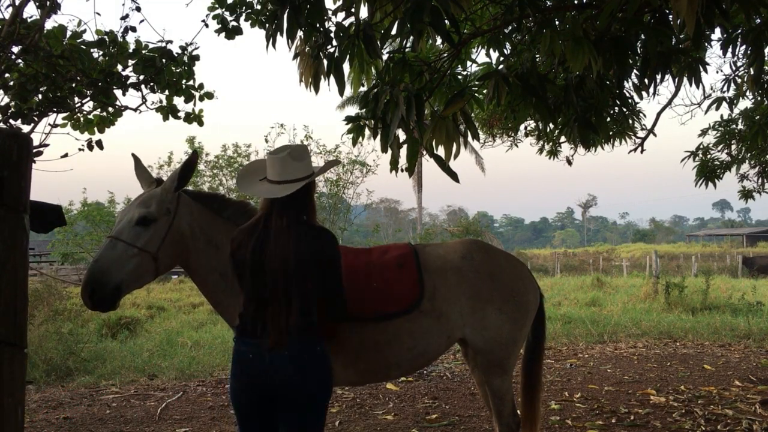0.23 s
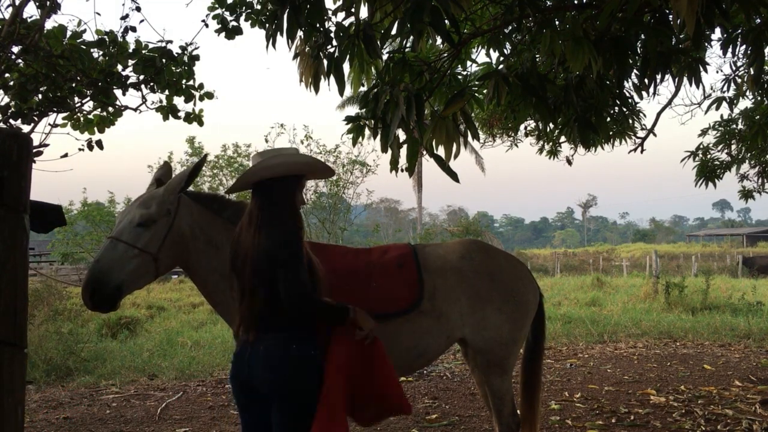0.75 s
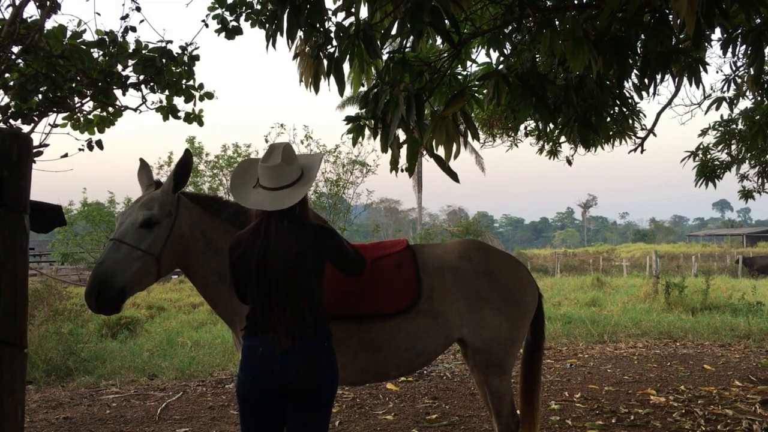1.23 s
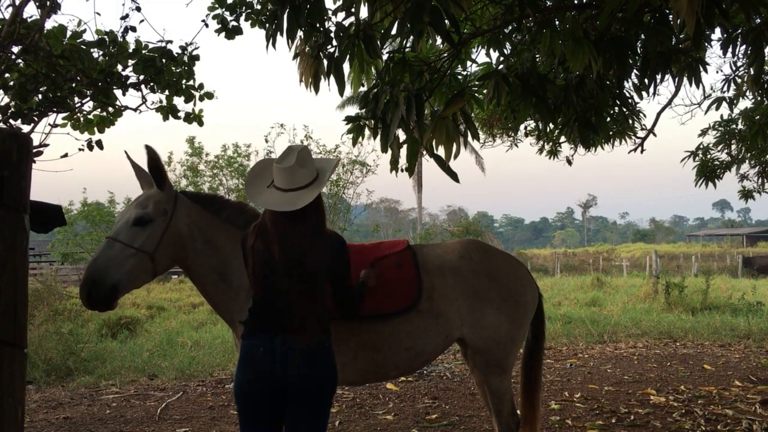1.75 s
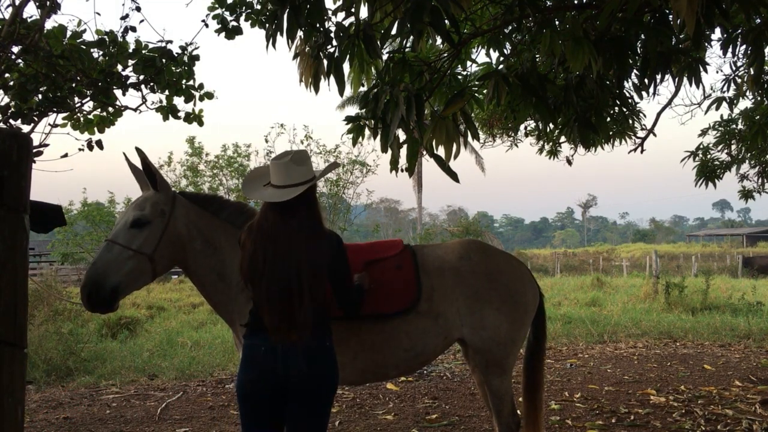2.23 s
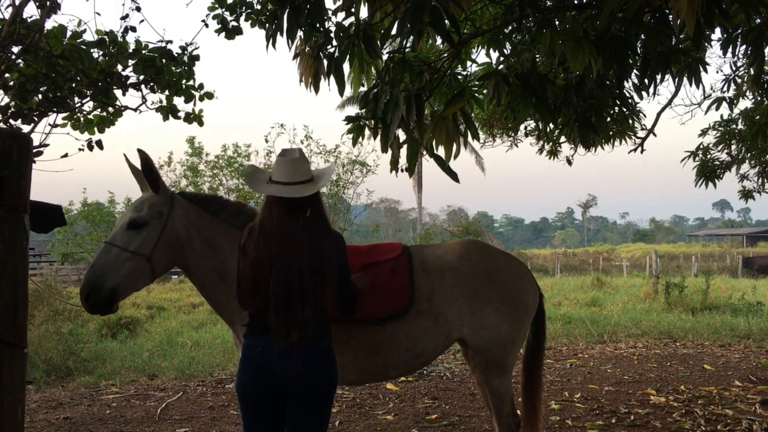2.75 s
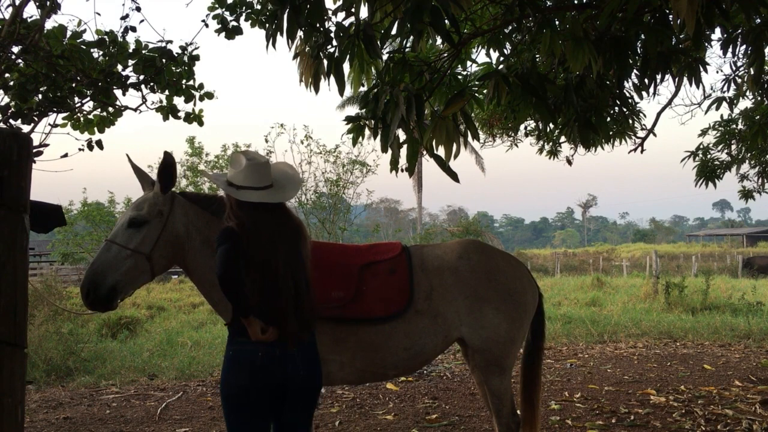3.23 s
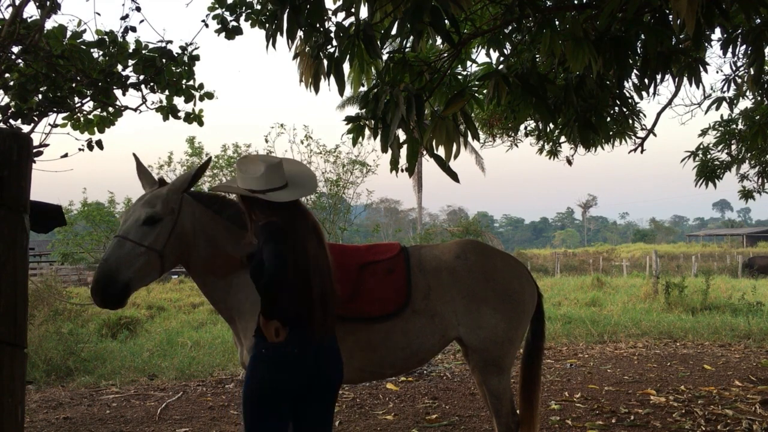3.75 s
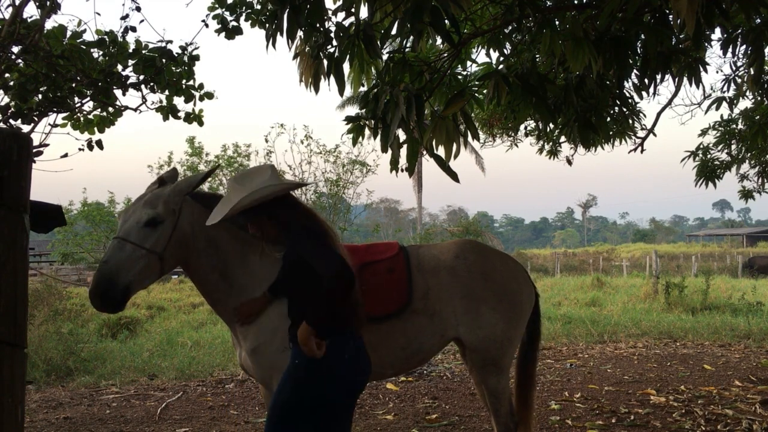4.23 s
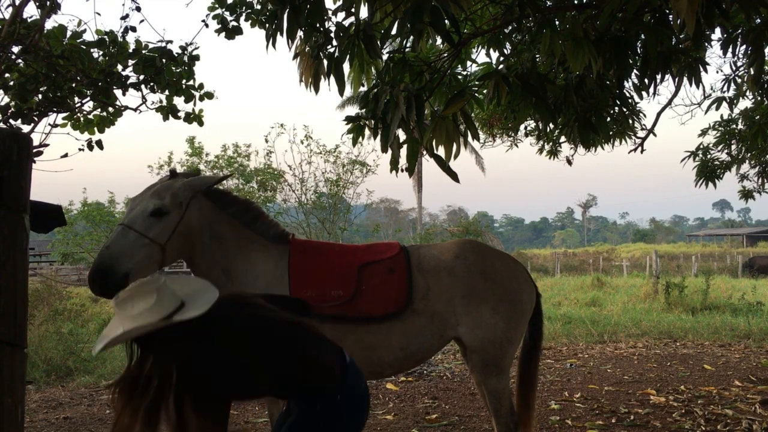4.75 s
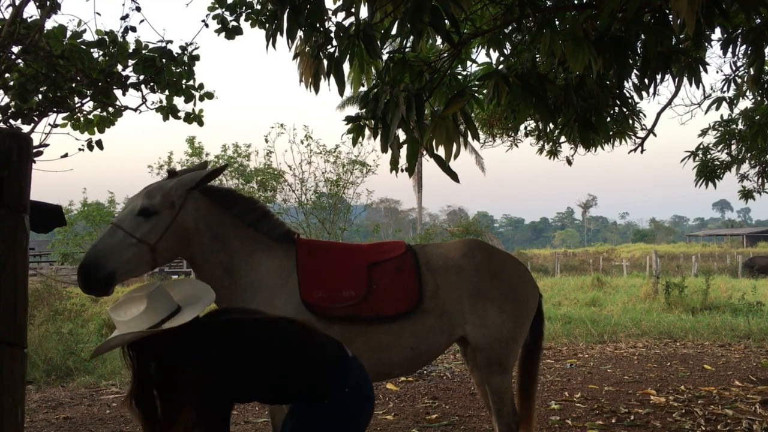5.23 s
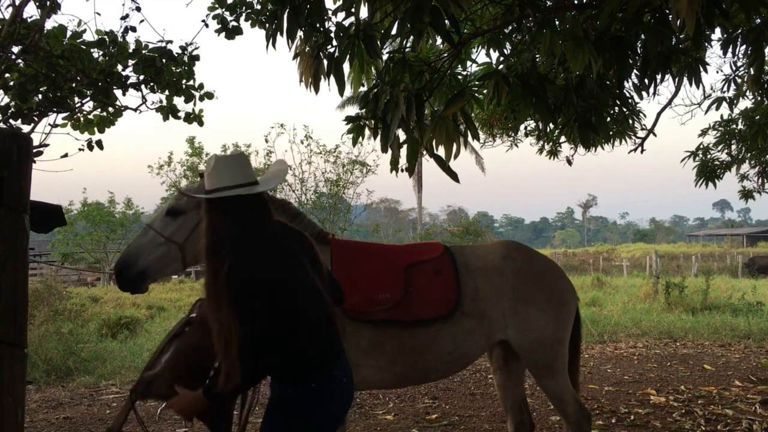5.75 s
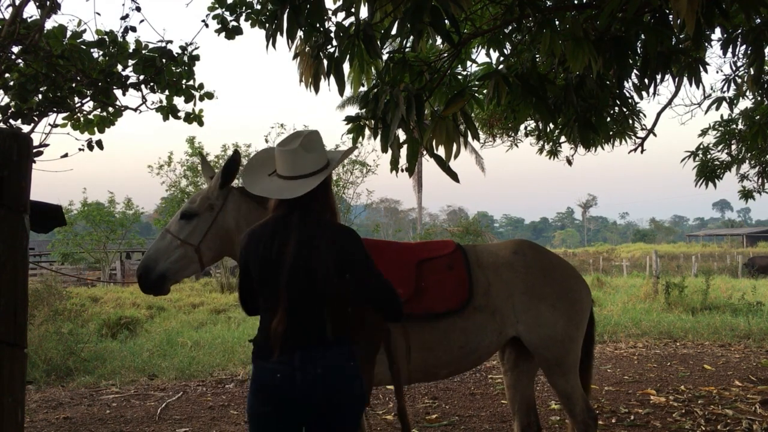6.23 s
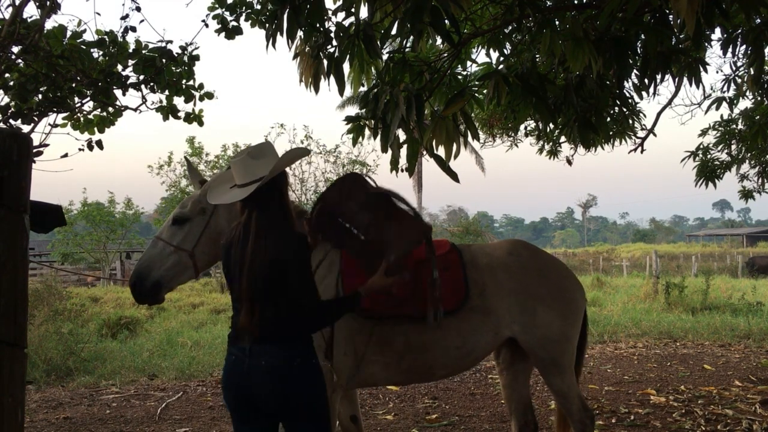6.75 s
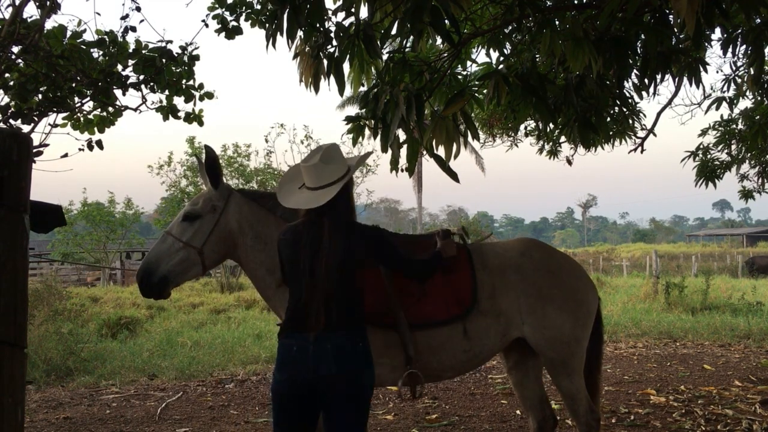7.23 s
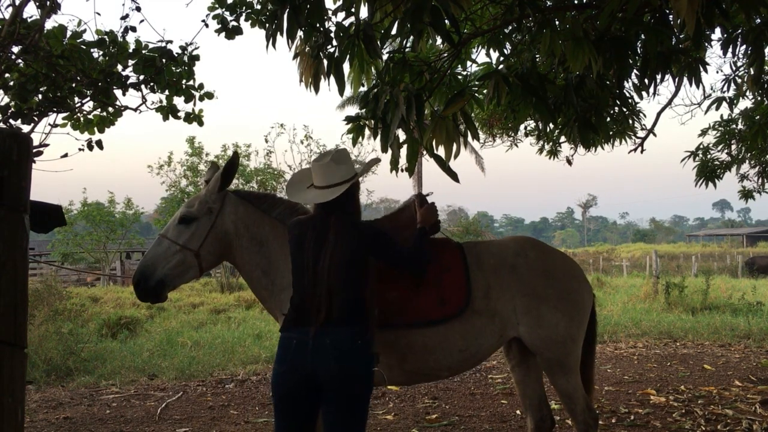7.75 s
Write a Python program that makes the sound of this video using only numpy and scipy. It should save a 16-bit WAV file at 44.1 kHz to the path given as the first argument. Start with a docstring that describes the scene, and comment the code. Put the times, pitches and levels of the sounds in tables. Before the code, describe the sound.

Cattle moo and bellow in the distance while close saddle tack rustles, thumps and gives one sharp steel clink.

```python
"""Under a tree on a farm, one microphone close to a mule being saddled. Some way off, cattle give three
low moos and one high, cracking bellow, vocal folds pulsing through throat and nose; a farther cow
sounds thin and nasal. Close by, blanket and leather rub, rustle and thump, tack steel ticks, and the
steel cinch ring chatters in one loud clink. Small birds chirp over a thin hiss of insects."""
import sys
import numpy as np
from scipy import signal
from scipy.fft import rfft, irfft
from scipy.io import wavfile
from scipy.ndimage import uniform_filter1d

SR = 44100
rng = np.random.default_rng(int(sys.argv[2]) if len(sys.argv) > 2 else 0)


def unload_wav(signal):
    """Save mono or channel-first audio to the path in sys.argv[1] as 16-bit WAV at rate SR, clipped to [-1, 1]."""
    wavfile.write(
        sys.argv[1],
        SR,
        np.round(np.clip(np.atleast_2d(signal).T, -1, 1) * 32767).astype(np.int16),
    )


N = 352338
T = np.arange(N) / SR
CUTOFF_HZ = 15900

# modes of the steel cinch ring: pitch_hz, chatter_db, after_ring_db
RING_MODES = [(1600, -42, -16), (1730, -40, -20), (3192, -31, -19), (4803, -37, -9), (5250, -33, -7),
              (7211, -30, -21), (7620, -43, -4), (8890, -37, -16), (9917, -24, -14), (11083, -35, -15),
              (11740, -32, -13), (12732, -33, -18), (13315, -27, -21), (13958, -29, -21), (15402, -35, -10)]


def moos():
    """Some way off, a nasal hum climbs and drops back into the chest; the open mouth adds a roar."""
    # one curve for each moo: time_s, pitch_hz, mouth_opening (0-1)
    curves = [
        [(2.154, 53.6, 0), (2.3, 55.77, 0.07), (2.5, 88.2, 0.12), (2.59, 97.2, 0.43), (2.85, 80.46, 0.27),
         (2.945, 64.1, 0.13)],
        [(3.975, 54.78, 0.21), (4.07, 88.2, 0.18), (4.2, 103.4, 0.72), (4.27, 128.3, 0.54), (4.39, 146.9, 0.66),
         (4.62, 146.1, 0.45), (4.73, 134.6, 0.38), (4.755, 83, 0.4), (4.88, 74, 0.25)],
        [(5.865, 75.87, 0.18), (5.94, 82.64, 0.31), (6.05, 148.2, 0.42), (6.23, 145.9, 1), (6.31, 133.8, 0.48),
         (6.36, 122.7, 0.43), (6.44, 141, 0.61), (6.53, 143.8, 0.45), (6.56, 79.5, 0.35), (6.62, 73.6, 0.24)],
    ]
    # what each moo swells to: level_db
    end_levels = [-49.5, -46.5, -45.5]
    # resonances of the open mouth: centre_hz, width_hz, gain_db
    mouth_modes = [(606, 180, -4.5), (846, 143, 3), (1112, 154, 2), (1330, 210, -6.5), (1793, 440, -10),
                   (3250, 260, -18.5)]
    slack_hz, doubling_hz = 90.2, 138  # folds flap weakly below the first; pulses alternate above the second
    times, hz, mouth = np.concatenate(curves).T
    pitch, opening = np.interp(T, times, hz), np.interp(T, times, mouth)
    level = 0
    for curve, db in zip(curves, end_levels):
        start, end = curve[0][0], curve[-1][0]
        level += from_db(db) * envelope(start, end - start, 0.014, 0.081, swell_db_per_s=6.5)
    tension = np.minimum(pitch / slack_hz, 1)
    rough = .12 + .9 * opening ** 2 + (1 - tension)
    doubling = 0.31 * (1 + np.tanh((pitch - doubling_hz) / 2))
    pulses = folds(pitch, rough, jitter=.08, doubling=doubling)
    hum = tension ** 3 * throat(band(pulses, 85, 283.4, order=6), [(194, 162, 0)])  # through the nose
    chest = rms_one(band(pulses, 47, 108)) * (slack_hz / pitch) ** 2.07
    roar = opening * throat(folds(pitch, rough=1.4, jitter=.02, doubling=doubling), mouth_modes)
    return level * (hum + from_db(-7.5) * chest + roar)


def bellow():
    """A soft rising moan cracks into high surges that swell and climb, rasping on every sixth cycle."""
    # surges of the broken voice, levels relative: start_s, length_s, cry_db, rasp_db
    surges = [(3.238, 0.28, -36, -49), (3.53, 0.06, -45, -66), (3.626, 0.063, -47, -56),
              (3.76, 0.075, -44, -54.5), (3.948, 0.09, -43, -59.5), (4.254, 0.073, -47, -58)]
    # throat resonances of the cry: centre_hz, width_hz, gain_db
    cry_modes = [(405, 1130, -20), (1109, 146, 0), (1500, 105, -16.5), (2010, 560, -15.5), (2810, 320, -20)]
    # throat resonances of the rasp: centre_hz, width_hz, gain_db
    rasp_modes = [(534, 140, -1.5), (753, 100, 8.5), (1065, 253, 11.5), (1750, 880, -6), (2730, 550, -20)]
    moan_s, break_s, cry_hz = 2.98, 3.235, 515.6
    edges = dict(attack_s=0.012, release_s=0.037)
    pitch = 305.9 + 290 * np.clip(T - moan_s, 0, 1)
    cry = from_db(-60) * envelope(moan_s, break_s - moan_s, **edges, swell_db_per_s=56)
    rasp = from_db(4) * cry
    for start, length, cry_db, rasp_db in surges:
        pitch = np.where(T < start, pitch, cry_hz + 135 * np.minimum(T - start, length))
        cry += from_db(cry_db) * envelope(start, length, **edges, swell_db_per_s=51)
        rasp += from_db(rasp_db) * envelope(start, length, 0.011, 0.11, swell_db_per_s=8)
    tone = throat(folds(pitch, rough=.7, jitter=0.024), cry_modes) * from_db(2 * drift(50))
    rasp_pitch = np.where(pitch < cry_hz, pitch, pitch / 6)
    pulses = folds(rasp_pitch, rough=.7, jitter=.02)
    growl = throat(pulses, rasp_modes) + from_db(-12.5) * rms_one(band(pulses, 232, 520))
    return from_db(-0.3) * cry * tone + from_db(2.5) * rasp * growl


def far_cow():
    """Only the nasal ring of these calls carries across the pasture; pitch and level arch together."""
    # distant calls, levels relative: start_s, length_s, first_hz, last_hz, level_db
    calls = [(2.19, .62, 107.8, 104.9, -53.5), (7.3, .44, 112.9, 118.4, -52)]
    # nasal resonances: centre_hz, width_hz, gain_db
    nasal_modes = [(1545, 78, 17), (1850, 730, 5.6)]
    out = 0
    for start, length, first_hz, last_hz, db in calls:
        effort = arch(start, length)
        pitch = np.interp(T, [start, start + length], [first_hz, last_hz]) + 9 * effort
        out += from_db(db - 6.5) * effort * throat(folds(pitch, rough=0.12, jitter=0.029), nasal_modes)
    return out


def cinch_ring():
    """Close up, steel chatters on steel, feeding the modes, then rings on until the leather damps it."""
    clink_s, chatter_s, rest_s = 7.1718, 0.027, 7.262
    twin_split, twin_db = 0.0076, -11.5  # a ring not quite round has a twin just above each mode
    age = np.maximum(T - clink_s, 0)
    chatter = (1 - np.exp(-age / 0.00064)) * fade(clink_s, 0.23)
    chatter *= np.exp(-np.maximum(age - chatter_s, 0) / 0.0016)
    damped = np.where(T < rest_s, 1, fade(rest_s, t60=0.33))
    out = from_db(-26) * band(rng.standard_normal(N) * fade(clink_s, 0.086), 2950, 16000, order=1)
    for hz, chatter_db, after_db in RING_MODES:
        t60 = 0.5 * np.sqrt(5000 / hz)  # high modes die sooner
        shaken = 1 + .5 * (drift(130) + 1j * drift(130))  # each touch shifts strength and phase
        driven = from_db(chatter_db + 1.5) * chatter * shaken
        after_ring = from_db(chatter_db + after_db + 3) * fade(clink_s, t60) * damped
        turn = 2j * np.pi * hz * age
        twins = np.exp(turn) + 1j * from_db(twin_db) * np.exp(turn * (1 + twin_split))
        out += np.imag((driven + after_ring) * twins)
    return out


def ring_jingle():
    """The cinch ring's upper modes jingle as the saddle is lifted."""
    # light touches on the ring: time_s, level_db
    touches = [(5.243, -39), (5.291, -31)]
    return band(jingle(touches, RING_MODES, t60=0.16), 5800, CUTOFF_HZ)


def steel_ticks():
    """Light touches on the cinch ring and other tack steel, ringing briefly."""
    # touches on the steel: time_s, level_db
    touches = [(5.62, -68), (6.119, -64), (6.237, -52)]
    # modes of the lightly touched cinch ring: pitch_hz, gain_db
    modes = [(4850, -4), (7610, 5), (8970, 6), (9920, -2), (11650, -9), (13350, -2)]
    return jingle(touches, modes, t60=0.12)


def thuds():
    """Blanket, saddle and feet land dully near the microphone."""
    # soft impacts: time_s, peak_db, centre_hz
    contacts = [(.061, -46, 616), (.699, -49, 515), (1.167, -44.5, 245), (2.962, -36.5, 490),
                (5.03, -36, 193.2), (5.31, -34, 207), (5.328, -35.5, 885), (5.407, -38, 486),
                (5.596, -42.5, 382), (.785, -52, 497), (6.671, -44.5, 1240), (6.776, -36.5, 710.5),
                (7.068, -38, 795), (7.121, -34, 690), (7.14, -31.5, 580), (7.172, -40, 80),
                (7.649, -43, 530), (7.911, -44, 390)]
    return blows(contacts, t60=0.025, spread=1.89, tail_db=-5.5, tail_t60=0.19)


def snaps():
    """Bright snaps and clicks of tack close by, including the steel ring's last sharp touch."""
    # sharp impacts: time_s, peak_db, centre_hz
    contacts = [(4.836, -39.5, 5650), (5.446, -39, 3502), (5.455, -37, 5200), (5.599, -35.5, 13000),
                (5.62, -31, 6000), (6.235, -38.5, 11980), (6.668, -39.5, 9994), (7.203, -18.5, 15000),
                (7.302, -40, 8500), (7.414, -33.5, 8300), (7.501, -35, 1690)]
    return blows(contacts, t60=0.039, spread=2.2, tail_db=-5, tail_t60=0.16)


def handling():
    """With each stroke leather rubs dully; cloth and dry leaves rustle in clumps, with short crackles."""
    # strokes of cloth and leather, levels relative: start_s, length_s, rub_db, rustle_db
    strokes = [(0, 0.36, -64.5, -82), (1.166, 0.045, -63, -58), (4.447, 0.44, -62.5, -68),
               (5.032, 0.55, -58.5, -60), (5.49, 0.32, -61.5, -60.5), (6.007, 0.04, -59, -58.5),
               (6.289, 0.28, -65, -61), (6.696, .2, -61, -63.5), (7.006, 0.43, -58.5, -58.5),
               (7.478, 0.14, -56.5, -53), (7.6, 0.35, -61, -62.5)]
    peak_crackles_per_s, crackle_s = 350, 0.0018
    rub, rustle = from_db(-70.5), from_db(-73)  # faint stirring between strokes
    for start, length, rub_db, rustle_db in strokes:
        stroke = envelope(start, length, attack_s=0.16 * length, release_s=0.36)
        rub = np.maximum(rub, from_db(rub_db) * stroke)
        rustle = np.maximum(rustle, from_db(rustle_db) * stroke)
    onsets = rng.random(N) < peak_crackles_per_s / SR * np.sqrt(rustle / rustle.max())
    crackles = signal.lfilter([1], [1, -np.exp(-1 / (crackle_s * SR))], 1e-18 + onsets * rng.random(N))
    clumps = from_db(2.53 * drift(18)) * (1 + 1.11 * crackles)
    dull = rub * rms_one(band(rng.standard_normal(N), 120, 1630, order=1))
    bright = rustle * rms_one(band(rng.standard_normal(N), 1400, 8100, order=1)) * from_db(drift(430))
    return clumps * (from_db(-3) * dull + from_db(-5.5) * bright)


def birds():
    """One bird repeats a buzzy three-note song; another chirps clearly over a falling second voice."""
    # notes of the song, levels relative: delay_s, length_s, first_hz, last_hz, level_db
    notes = [(-.125, 0.16, 4770, 5220, -5.5), (0, .115, 5454, 5125, 0.5), (0.128, 0.12, 5850, 5020, -4)]
    # repeats of the song, levels relative: time_s, level_db, lead_note_db
    songs = [(0.657, -62, 1), (2.642, -58.5, -23), (6.851, -60.5, -6.5)]
    # clear chirps, levels relative: start_s, length_s, first_hz, last_hz, level_db
    chirps = [(0.49, 0.078, 6080, 6340, -70), (2.134, 0.11, 5590, 5500, -66.5),
              (3.755, 0.13, 6330, 7540, -66), (6.423, 0.11, 6970, 7470, -65),
              (7.64, 0.076, 6310, 5470, -66.5)]
    out, buzz, waver = np.zeros(N), 0.0312 * drift(260), 0.0182 * drift(110)
    for start, song_db, lead_db in songs:
        for delay, length, first_hz, last_hz, db in notes:
            gain = from_db(song_db + db + lead_db * (delay < 0))
            out += gain * bird_note(start + delay, length, first_hz, last_hz, buzz, octave_db=-21.5)
    for start, length, first_hz, last_hz, db in chirps:
        upper = bird_note(start, length, first_hz, last_hz, waver, octave_db=-26)
        lower = bird_note(start, length, 4100, 3220, waver, octave_db=-2)
        out += from_db(db) * (upper + from_db(-10.5) * lower)
    return out * from_db(3 + 3 * drift(70))


def bird_note(start, length, first_hz, last_hz, flutter, octave_db):
    """An arched glide with its upper octave starts sharply and weakens; flutter shakes its pitch."""
    out, at = np.zeros(N), np.flatnonzero((T > start) & (T < start + length))
    along = np.linspace(0, 1, len(at))
    hz = (first_hz + (last_hz - first_hz) * along) * (1 + 0.02266 * np.sin(np.pi * along))
    phase = 2 * np.pi * np.cumsum(hz * (1 + flutter[at])) / SR
    level = signal.windows.tukey(len(at), .2) * from_db(5.5 * (1 - along))
    out[at] = level * (np.sin(phase) + from_db(octave_db) * np.sin(2 * phase))
    return out


def insects():
    """Insects merge into one thin, steady hiss."""
    return from_db(-79.5) * rms_one(band(rng.standard_normal(N), 4690, 5600))


def air():
    """Still farm air: a low rumble and faint hiss whose level wavers slightly."""
    # spectrum of the background: frequency_hz, relative_db
    spectrum = [(15, -43), (25, -13), (69, 3), (537, -11.5), (1300, -22), (3930, -19.5), (4870, -14),
                (6380, -25.5), (15500, -32.5)]
    hz, db = np.transpose(spectrum)
    colour = np.interp(np.log(np.arange(N // 2 + 1) * SR / N + 1), np.log(hz), db)
    bed = rms_one(irfft(rfft(rng.standard_normal(N)) * from_db(colour), N))
    return from_db(-65) * bed * from_db(drift(7))


def pasture(x, wet_db, t60):
    """Trees and sheds scatter a diffuse tail behind far sounds."""
    tail = (rng.standard_normal(N) * fade(0.019, t60))[:SR]
    return x + from_db(wet_db) * signal.fftconvolve(x, tail / np.linalg.norm(tail))[:N]


def folds(pitch, rough, jitter, doubling=0):
    """Vocal folds pulse once a cycle; roughness unsettles timing and strength and adds puffs of air."""
    cycles = np.cumsum(pitch * (1 + jitter * rough * drift(45))) / SR
    pulses = np.diff(np.floor(cycles), prepend=0) * (1 + rough * np.tanh(drift(60)))
    pulses *= 1 - doubling * (np.floor(cycles) % 2)  # every other pulse weakens
    puffs = rng.standard_normal(N) * np.exp(-2 * (cycles % 1))
    return rms_one(pulses) + rough * rms_one(puffs)


def throat(x, modes):
    """Parallel resonances, each applied twice for dark valleys; the level is evened out."""
    y = sum(from_db(db) * resonate(resonate(x, hz, width), hz, width) for hz, width, db in modes)
    return y / np.sqrt(np.abs(uniform_filter1d(y * y, size=2200)) + 1e-14)


def jingle(touches, modes, t60):
    """Light touches set a piece of steel ringing, each time with a different balance of modes."""
    out, t = np.zeros(N), T[:SR // 2]
    for start, db in touches:
        shares = rng.uniform(0.3, 1.7, len(modes))
        ring = sum(share * from_db(mode_db) * np.sin(2 * np.pi * hz * t)
                   for (hz, mode_db, *_), share in zip(modes, shares))
        at = round(start * SR)
        out[at:at + len(t)] += from_db(db - 60 * t / t60) * ring
    return out


def blows(contacts, t60, spread, tail_db, tail_t60):
    """Each contact is a noise burst around its own pitch, with a weak tail; bright ones are shorter."""
    out, t = np.zeros(N), T[:SR // 4]
    for start, db, hz in contacts:
        age = t * (hz / 1000) ** (1 / 4)  # the decay times hold at 1 kHz
        push = from_db(-60 * age / t60) + from_db(tail_db - 60 * age / tail_t60)
        burst = band(rng.standard_normal(len(t)) * push, hz / spread, hz * spread)
        at = round(start * SR)
        out[at:at + len(t)] += (from_db(db) * burst / np.abs(burst).max())[:N - at]
    return out


def envelope(start, length, attack_s, release_s, swell_db_per_s=0):
    """Attack, a hold that swells up to gain 1, and a release that falls 60 dB in release_s."""
    past = T - start - length
    db = swell_db_per_s * np.minimum(past, 0) - 60 * np.clip(past / release_s, 0, 3)
    return np.clip((T - start) / attack_s, 0, 1) * from_db(db)


def arch(start, length):
    """Half a sine: from 0 up to 1 and back."""
    return np.sin(np.interp(T, [start, start + length], [0, np.pi]))


def fade(start, t60):
    """Sudden onset, then a fall of 60 dB in t60 seconds."""
    return (T >= start) * np.exp(-np.log(1000) * np.clip((T - start) / t60, 0, 10))


def drift(rate_hz):
    """Smooth random wander with rms 1."""
    knots = rng.standard_normal(N // 8)
    return rms_one(np.interp(T * rate_hz * 2, np.arange(len(knots)), knots))


def band(x, low_hz, high_hz, order=2):
    """Butterworth band-pass."""
    sos = signal.butter(order, [low_hz, min(high_hz, SR / 2.1)], "band", fs=SR, output="sos")
    return signal.sosfilt(sos, x + 1e-18)


def resonate(x, hz, width_hz):
    """One resonance with gain 1 at its peak."""
    r = np.exp(-np.pi * width_hz / SR)
    feedback = [1, -2 * r * np.cos(2 * np.pi * hz / SR), r * r]
    return signal.lfilter(np.array([1, 0, -1]) * (1 - r * r) / 2, feedback, x + 1e-18)


def from_db(db):
    """Decibels to gain."""
    return 10 ** (np.asarray(db) / 20)


def rms_one(x):
    """Scale to rms 1."""
    return x / np.sqrt(np.mean(x ** 2) + 1e-20)


def scene():
    """Far animals, near tack and still air, alike in both channels."""
    cattle = pasture(moos() + far_cow() + bellow(), wet_db=-4.5, t60=0.28)
    tack = thuds() + snaps() + cinch_ring() + ring_jingle() + steel_ticks() + handling()
    background = insects() + air() + pasture(birds(), wet_db=-2, t60=0.27)
    mono = cattle + tack + background
    return np.array([mono, mono])


def record(dry):
    """The highest treble is cut steeply."""
    return signal.sosfilt(signal.ellip(10, .1, 80, CUTOFF_HZ, fs=SR, output="sos"), dry)


dry = scene()
out = record(dry)
unload_wav(out)
```